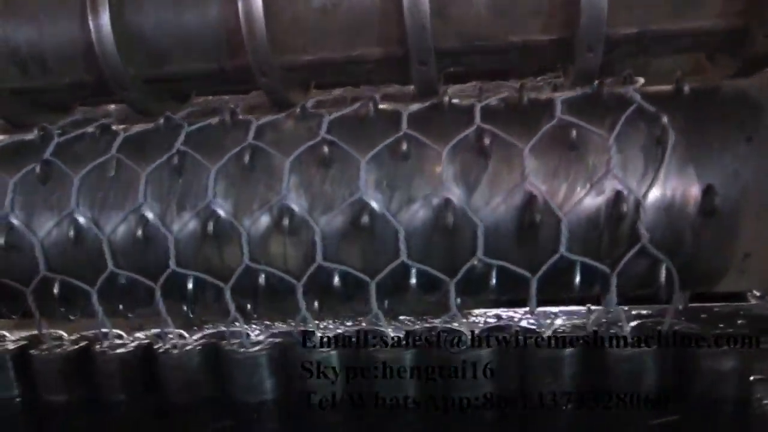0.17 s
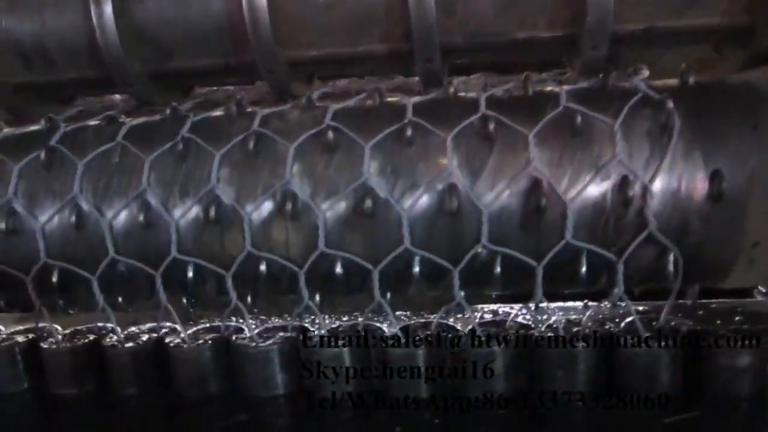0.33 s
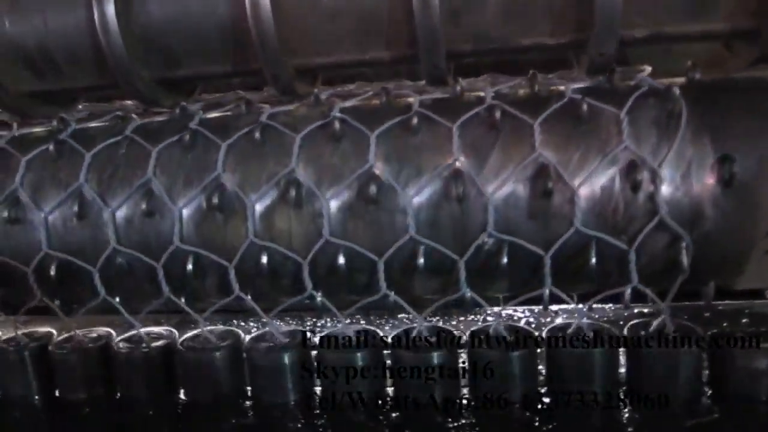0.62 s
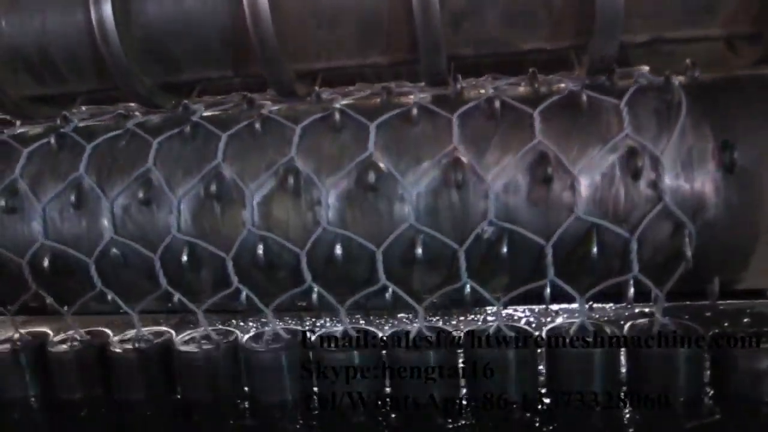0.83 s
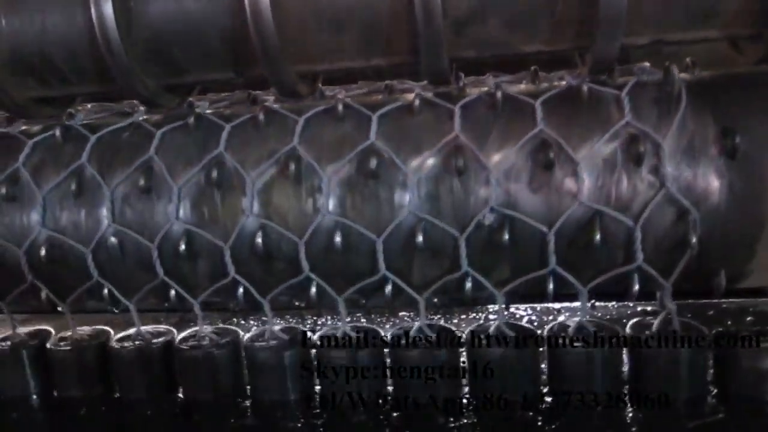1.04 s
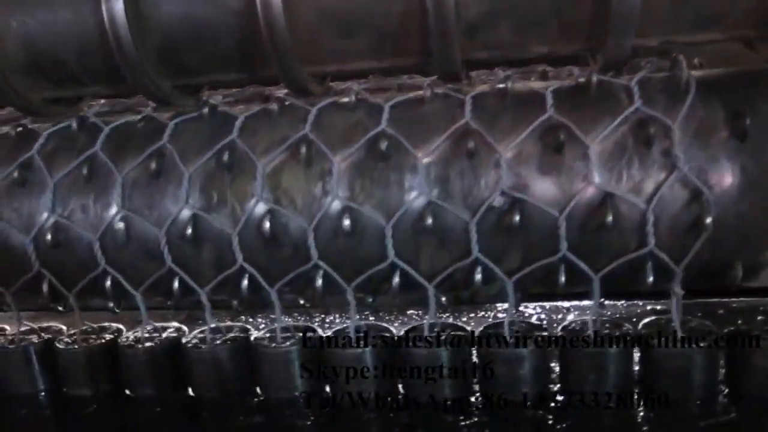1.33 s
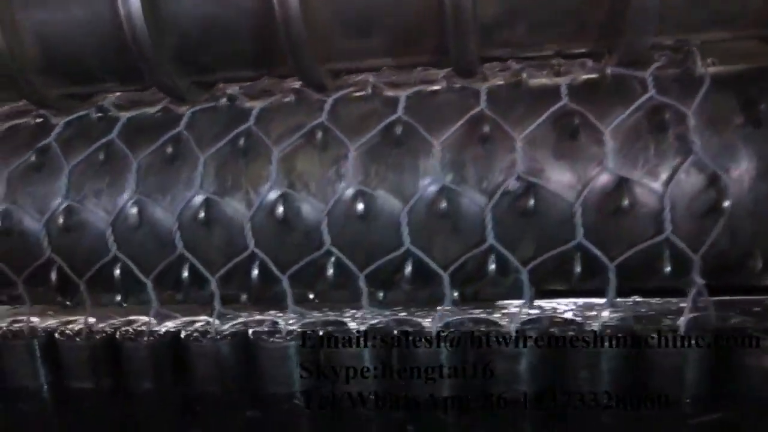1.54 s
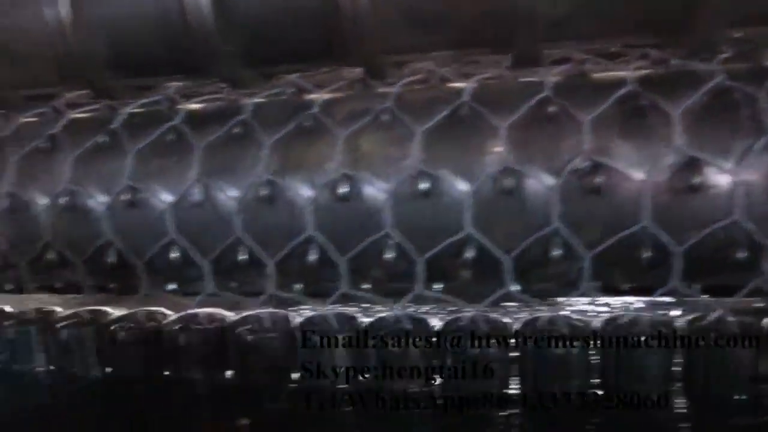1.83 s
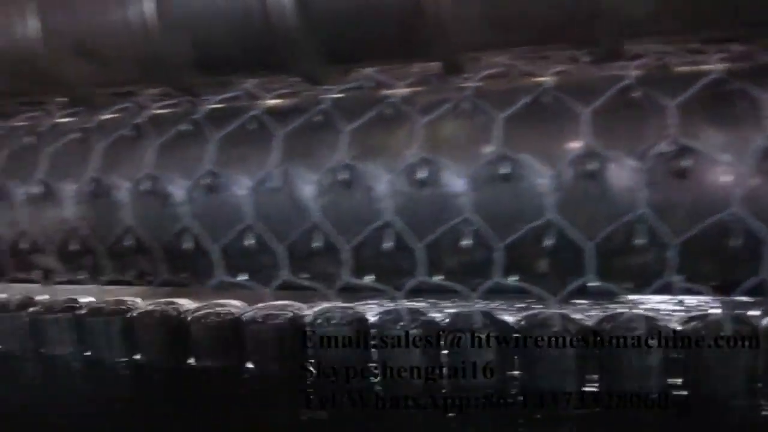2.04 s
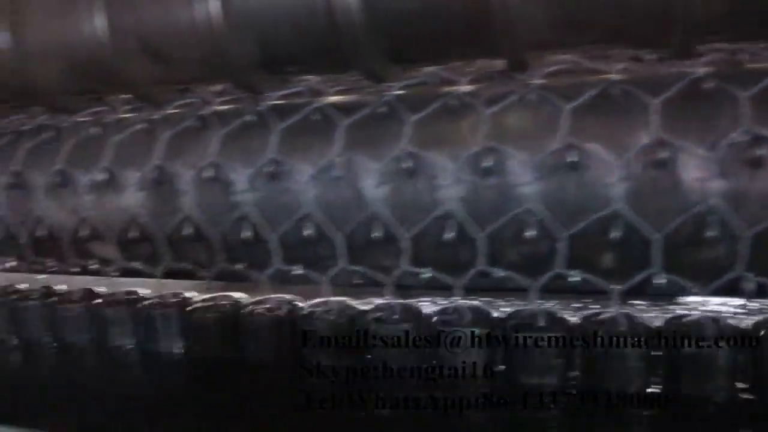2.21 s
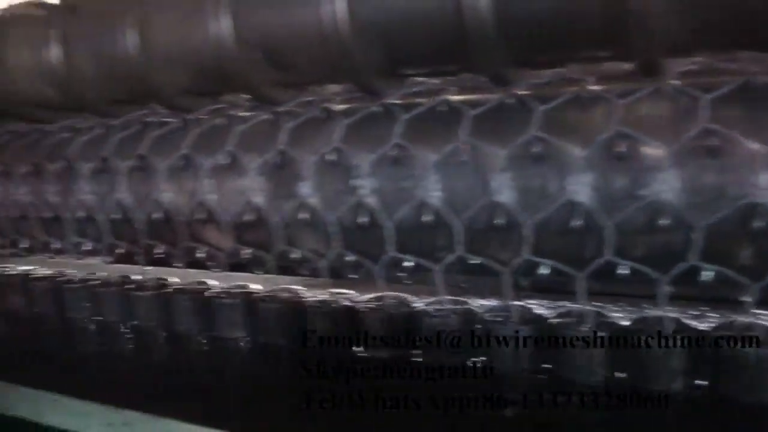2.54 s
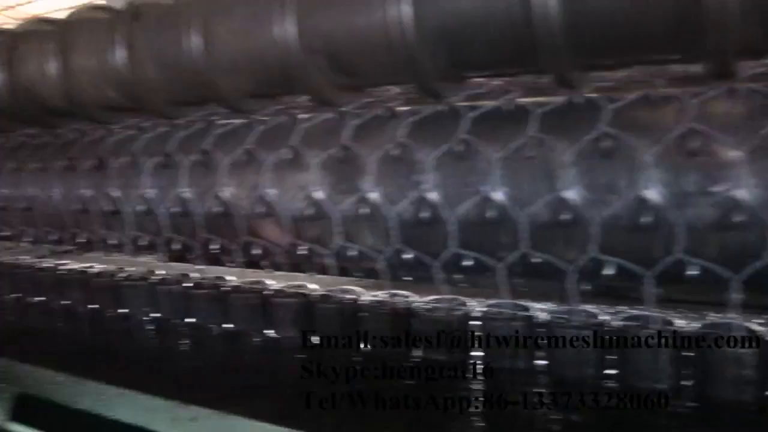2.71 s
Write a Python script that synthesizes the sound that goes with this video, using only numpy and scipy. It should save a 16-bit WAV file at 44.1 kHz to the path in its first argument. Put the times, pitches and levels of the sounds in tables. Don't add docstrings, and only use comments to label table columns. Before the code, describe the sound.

Close stereo pickup of a mesh-weaving machine: bright metal clanks and heavy rack slams come in bursts, gears and wires rattle between them, a thin bearing whistle appears midway, and the hall adds a short dull tail.

```python
import sys
import numpy as np
from scipy import signal
from scipy.fft import rfft, irfft, next_fast_len
from scipy.io import wavfile

SR = 44100
rng = np.random.default_rng(int(sys.argv[2]) if len(sys.argv) > 2 else 0)


def master(y):
    cut = np.clip(np.atleast_2d(y).T, -1, 1)
    pcm = np.round(cut * 32767)
    wavfile.write(sys.argv[1], SR, pcm.astype(np.int16))


def volts(x):
    e = np.asarray(x, float) / 20
    return 10 ** e


N = 126567

# [t/s, level/dB]
TWIST_LEVEL = [(0, -31), (.1, -28), (.235, -34), (.28, -38), (.45, -30.5), (.65, -26.5), (.9, -27.5),
               (1.3, -39.5), (1.5, -38), (1.64, -36), (1.8, -29.5), (2.05, -24), (2.25, -30), (2.55, -39.5),
               (2.7, -37), (2.87, -25)]
# [f/Hz, level/dB]
RATTLE_TONE = [(200, -1.5), (600, 9), (1300, 2), (2800, 2), (5000, -4.5), (7000, -12), (10600, -15),
               (13500, -24.5), (15500, -69)]
# [t/s, level/dB]
MOTOR_LOAD = [(0, -26), (.27, -27.5), (.6, -29), (1.0, -29.5), (1.3, -31.5), (1.62, -30.5), (2.0, -27.5),
              (2.4, -30), (2.6, -35), (2.87, -28)]
# [f/Hz, level/dB]
RUMBLE_TONE = [(25, -86), (50, 7), (100, 7.5), (300, 6.5), (600, -1), (1300, -13.5), (6000, -26.5)]
# [t/s, peak level/dB, chatter length/s, sizzle level/dB]
SPINDLE_CLANKS = [(0.0936, -10, 0.0074, -19), (0.155, -39, 0.0071, -17), (0.222, -17.5, 0.0013, -29),
                  (0.2925, -5.5, 0.0079, -13.5), (0.333, -8.5, 0.015, -26), (0.374, -4, 0.014, -11.5),
                  (0.45, -21, 0.0054, -4), (0.7045, -9, 0.0035, -22), (0.7952, -10.5, 0.0049, -22),
                  (0.8565, -17, 0.0091, -14), (0.8802, -15, 0.0095, -27), (0.949, -26, 0.012, -11),
                  (1.144, -31, 0.0064, -7), (1.347, -22.5, 0.017, -50), (1.3695, -6, 0.0046, -14),
                  (1.415, -8, 0.014, -16), (1.645, -7.5, 0.0043, -13.5), (1.688, -11.5, 0.022, -30),
                  (1.733, -9.5, 0.0036, -14), (1.7787, -10.5, 0.0038, -6), (1.873, -16, 0.0059, -69),
                  (1.927, -18, 0.0061, -19), (1.944, -18, 0.025, -6), (2.033, -20, 0.011, -32),
                  (2.156, -8, 0.0045, -8.5), (2.219, -19, 0.016, -7), (2.5882, -17.5, 0.0032, -11),
                  (2.616, -26, 0.0079, 0), (2.723, -20, 0.017, -12), (2.7544, -17, 0.015, -26),
                  (0, -15.5, 0.0013, -39), (0.109, -10.5, 0.0078, -16), (0.395, -10.5, 0.024, -15.5),
               (0.521, -16.5, 0.032, -20), (0.584, -25.5, 0.051, -6.5), (0.748, -22, 0.037, -3.5),
               (1.081, -31.5, 0.023, -4), (1.39, -7, 0.012, -12.5), (1.436, -10, 0.0059, -13),
               (1.379, -6.5, 0.0086, -24), (0.154, -24, .003, -16), (2.663, -36, 0.045, 6),
               (2.005, -28, 0.0072, -4), (2.181, -23, 0.03, -3.5), (2.636, -24.5, 0.02, -1),
               (2.86, -12, 0.013, -24)]
# [f/Hz, level/dB]
SPINDLE_MODES = [(2350, -9), (2780, -3), (3100, -3), (3340, -1), (3560, -2), (3900, -5), (4350, -3),
                 (4650, -2), (5130, -6)]
# [f/Hz, level/dB]
CRACK_TONE = [(300, 5.5), (1000, 3), (2500, 8), (5000, 3), (7000, 0), (8500, -17)]
# [f/Hz, level/dB]
SIZZLE_TONE = [(7000, -3.5), (8800, 2), (10900, 3.5), (12000, -4.5), (15600, -11)]
# [t/s, peak level/dB, f/Hz, ring t60/s]
PIN_PINGS = [(0.097, -26, 2670, 0.058), (.112, -22, 4220, 0.046), (0.219, -22, 2660, 0.032),
             (0.293, -14, 2840, 0.063), (0.2917, -10, 3290, .05), (.2925, -18, 4600, 0.14),
             (0.303, -19, 2700, 0.03), (0.293, -21, 1380, .1), (.336, -13.5, 1207, 0.091),
             (.341, -20, 3040, 0.033), (0.339, -18, 4730, .04), (0.375, -10.5, 4300, 0.044),
             (0.381, -22, 2900, 0.055), (0.393, -13, 2870, 0.032), (.462, -25, 3120, 0.044),
             (.705, -17, 3600, 0.023), (.001, -18, 4590, 0.036), (0.887, -20, 2540, 0.03),
             (1.143, -24.5, 2860, .045), (1.3689, -12.5, 4010, 0.041), (1.378, -14, 2890, .04),
             (1.385, -13, 3320, 0.051), (1.386, -20, 2180, 0.033), (1.394, -27, 2900, 0.036),
             (1.396, -11, 4540, .05), (1.420, -21, 2760, 0.05), (1.424, -15.5, 4970, .05),
             (1.436, -13, 4500, .04), (1.439, -29, 3120, 0.025), (1.6454, -13, 2760, 0.04),
             (1.647, -12, 3500, 0.02), (1.648, -14, 4560, 0.028), (1.651, -21, 4700, 0.018),
             (1.672, -18.5, 1295, 0.12), (1.735, -10.5, 3570, 0.03), (1.7827, -14, 2390, 0.029),
             (1.7812, -17, 3300, 0.028), (1.7816, -18.5, 4250, 0.033), (2.158, -19.5, 2770, .05),
             (2.157, -19, 4610, 0.045), (2.221, -17, 3470, 0.041), (2.220, -22.5, 1244, .1),
             (2.700, -32, 5600, .06), (2.735, -43, 5700, 0.041), (2.760, -19.5, 3130, .04),
             (2.802, -26, 4860, .06)]
# [t/s, level/dB, length/s]
WIRE_SQUEAKS = [
    (0.092, -33, 0.021),
    (0.569, -36, 0.046),
    (0.932, -37, 0.017),
    (1.005, -51, 0.068),
]
# [f/Hz, width/Hz, level/dB]
WIRE_RESONANCES = [(4103, 220, 5.5), (6090, 150, -4)]
# [t/s, level/dB]
WHISTLE_LEVEL = [(0, -72), (.88, -37), (.93, -48), (1.0, -45), (1.035, -35), (1.09, -54), (1.115, -34),
                 (1.16, -39), (1.185, -41), (1.21, -42), (1.33, -41.5), (1.37, -39), (1.42, -70)]
# [t/s, level/dB, length/s, clatter level/dB]
RACK_THUDS = [(0.099, -21.5, 0.057, -23), (0.291, -27, 0.03, 6), (0.321, -23.5, 0.034, 6.5),
              (0.369, -14, 0.03, -8), (0.502, -21.5, 0.047, -9.5), (0.766, -26.5, 0.069, -0.5),
              (1.34, -18, 0.021, -19), (1.366, -16.5, 0.044, -9.5), (1.422, -21, 0.032, -12),
              (1.641, -27, 0.076, 1.5), (1.687, -13, 0.03, -2.5), (1.735, -19.5, 0.023, -2.5),
              (1.953, -18, 0.027, -32), (2.207, -33, 0.065, -2.5), (2.722, -23, 0.048, -5.5),
              (2.835, -27, 0.043, -15)]
# [f/Hz, level/dB]
FRAME_MODES = [(156, -14), (228, -16), (266, 0.5), (323, 0), (385, -3.5), (520, -5.5), (660, -2),
               (780, -5.5), (930, -16), (1200, -5), (1425, -10.5)]
# [f/Hz, level/dB]
CLATTER_TONE = [(150, 1.5), (400, 2), (1100, 4), (2200, -1), (5000, -25)]
# [f/Hz, level/dB]
STEREO_WIDTH = [(30, -7), (70, -29), (125, -33), (250, -23.5), (500, -18.5), (1000, -10.5), (2000, -5.5),
                (5000, -1)]
# [f/Hz, level/dB]
STEREO_LEAN = [(300, 0), (1200, -2), (4000, -0.1)]

CHATTER_PER_S, CHATTER_SPREAD_DB = 7100, 3.5
CLANK_RISE_S, CRACK_T60_S = 0.0006, 0.036
SPINDLE_T60_S, FRAME_T60_S = 0.016, 0.07
THUD_RISE_S, THUD_T60_S = 0.0072, 0.084
HALL_T60_S, HALL_DB, HALL_CUT_HZ = 0.66, -10.5, 5100
WHISTLE_HZ, WHISTLE_WANDER_HZ = 3936, 5
NOTCH_HZ, NOTCH_WIDTH_HZ = 8210, 1170
LOW_CUT_HZ, TOP_CUT_HZ, OVERLOAD = 89, 16400, 0.95


def rms_one(x):
    return x / np.sqrt(np.mean(x ** 2) + 1e-20)


def in_time(rows):
    return np.interp(np.arange(N) / SR, *np.transpose(rows))


def at_hz(points, hz):
    f, value = np.transpose(points)
    return np.interp(np.log(hz + 1), np.log(f), value)


def colour(x, points):
    size = next_fast_len(N + 8192)
    log_gain = at_hz(points, np.arange(4097) * SR / 8192) * np.log(10) / 20
    cepstrum = irfft(log_gain)
    cepstrum[1:4096] *= 2
    cepstrum[4097:] = 0
    impulse = irfft(np.exp(rfft(cepstrum)))
    return irfft(rfft(x, size) * rfft(impulse, size), size)[..., :N]


def drift(rate):
    r = np.exp(-80 * np.pi * rate / SR)
    noise = rng.standard_normal(N // 40 + 2002)
    slow = signal.lfilter([1], [1, -2 * r, r * r], noise)[2000:]
    return np.interp(np.arange(N) / 40, np.arange(len(slow)), rms_one(slow))


def ring(x, hz, t60):
    r = volts(-60 / (t60 * SR))
    w = 2 * np.pi * hz / SR
    gain = np.sin(w) * 2 * np.sqrt(1 - r)
    return signal.lfilter([0, gain], [1, -2 * r * np.cos(w), r * r], x + 1e-18)


def contacts(rate, spread_db):
    sizes = volts(spread_db * np.minimum(rng.exponential(1, (2, N)), 4.0))
    sizes = sizes * rng.choice([-1, 1], (2, N))
    return rms_one(sizes * (rng.random((2, N)) < rate / SR))


def bursts(s, db, length, rise, t60):
    t = np.arange(N) / SR
    power = np.zeros(N)
    for start, level_db, hold in zip(s, db, np.clip(length, .001, .1)):
        part = slice(int(start * SR), int((start + rise + hold + t60) * SR))
        age = t[part] - start
        fall_db = 60 * np.maximum(age - rise - hold, 0) / t60
        power[part] += (volts(level_db - fall_db) * np.clip(age / rise, 0, 1)) ** 2
    return np.sqrt(power)


def struck(modes, s, db, length, rise, t60, drive, decay):
    scatter_db = 3 * rng.standard_normal((len(s), len(modes)))
    out = np.zeros((2, N))
    for k, (hz, level_db) in enumerate(modes):
        blows = bursts(s, db + level_db + scatter_db[:, k], length, rise, t60)
        out += ring(drive * blows, hz, min(decay, 45 / hz))
    return out


def rattle():
    hits = contacts(6500, 2.5) * volts(2.2 * drift(25) + 1.5 * drift(8))
    pitches = np.geomspace(300, 15000, 30)
    dealt = rng.integers(0, 30, N)
    rings = np.zeros((2, N))
    for k, hz in enumerate(pitches):
        rings += np.sqrt(hz) * ring(hits * (dealt == k), hz, min(70 / hz, .05))
    fine = contacts(20000, 0.26) * volts(0.3 * drift(43))
    grit = colour(0.81 * rms_one(rings) + fine, RATTLE_TONE)
    return rms_one(grit) * volts(in_time(TWIST_LEVEL) + 1.5)


def rumble():
    noise = rng.standard_normal((2, N))
    body = sum(volts(db) * ring(noise, hz, FRAME_T60_S) for hz, db in FRAME_MODES)
    motors = rms_one(colour(noise, RUMBLE_TONE))
    return rms_one(motors + 0.19 * rms_one(body)) * volts(in_time(MOTOR_LOAD) + 0.91 * drift(9))


def clanks():
    s, db, length, sizzle_db = np.transpose(SPINDLE_CLANKS)
    chatter = contacts(CHATTER_PER_S, CHATTER_SPREAD_DB)
    rings = struck(SPINDLE_MODES, s, db - 20, length, CLANK_RISE_S, 0.19 / 3, chatter, SPINDLE_T60_S)
    crack = rms_one(colour(contacts(CHATTER_PER_S, CHATTER_SPREAD_DB), CRACK_TONE))
    crack = crack * bursts(s, db - 12.5, length, CLANK_RISE_S, CRACK_T60_S)
    sizzle = rms_one(colour(contacts(3500, 4.2), SIZZLE_TONE))
    sizzle = sizzle * bursts(s, db + sizzle_db - 6, length, CLANK_RISE_S, CRACK_T60_S)
    return rings + crack + sizzle


def pings():
    out = np.zeros((2, N))
    chance = rng.random((len(PIN_PINGS), 4, 1)) * 2 * np.pi
    for (s, db, hz, t60), phase in zip(PIN_PINGS, chance):
        start = int(s * SR)
        t = np.arange(min(int(t60 * SR), N - start)) / SR
        pair = np.sin(2 * np.pi * hz * t + phase[:2])
        pair = pair + 0.34 * np.sin(2 * np.pi * hz * 1.025 * t + phase[2:])
        out[:, start:start + len(t)] += pair * volts(db - 60 * t / t60) * np.minimum(t / 0.0004, 1)
    return out


def narrow(noise, hz, width):
    return rms_one(ring(ring(noise, hz, 2.2 / width), hz, 2.2 / width))


def squeal():
    noise = rng.standard_normal((2, N))
    s, db, length = np.transpose(WIRE_SQUEAKS)
    rub = sum(volts(level_db) * narrow(noise, hz, width) for hz, width, level_db in WIRE_RESONANCES)
    squeaks = rub * bursts(s, db, length, 0.015, 0.24)
    phase = 2 * np.pi * np.cumsum(WHISTLE_HZ + WHISTLE_WANDER_HZ * drift(21)) / SR
    whistle = np.array([np.sin(phase), np.cos(phase)])
    return squeaks + whistle * volts(in_time(WHISTLE_LEVEL) + 2.5 * drift(25))


def thuds():
    s, db, length, clatter_db = np.transpose(RACK_THUDS)
    drive = contacts(1500, 1.1)
    boom = struck(FRAME_MODES, s, db, length, THUD_RISE_S, THUD_T60_S, drive, FRAME_T60_S)
    clatter = rms_one(colour(contacts(3000, 2.7), CLATTER_TONE))
    return volts(-13.5) * boom + clatter * bursts(s, db + clatter_db, length, THUD_RISE_S, 0.04)


def hall(x):
    t = np.arange(int(1.2 * SR)) / SR
    tail = rng.standard_normal((2, len(t))) * volts(-60 * t / HALL_T60_S) * np.clip(t / 0.0028, 0, 1)
    tail = signal.lfilter([1], [1, -np.exp(-2 * np.pi * HALL_CUT_HZ / SR)], tail)
    return signal.fftconvolve(x, tail / np.sqrt(np.sum(tail ** 2) / 2), axes=1)[:, :N]


def scene():
    steady = rattle() + rumble()
    blows = clanks() + pings()
    steady = steady + squeal()
    blows = blows + thuds()
    mid, side = steady + blows + volts(HALL_DB) * hall(blows)
    side = colour(side, STEREO_WIDTH)
    lean = np.array(STEREO_LEAN) * [1, .5]
    left = colour(mid + side, lean)
    right = colour(mid - side, lean * [1, -1])
    return np.array([left, right])


def band_limit(x):
    return signal.sosfilt(signal.butter(12, 15760, fs=SR, output="sos"), x)


def record(dry):
    b, a = signal.iirnotch(NOTCH_HZ, NOTCH_HZ / NOTCH_WIDTH_HZ, SR)
    for _ in range(2):
        dry = signal.lfilter(b, a, dry)
    dry = signal.sosfilt(signal.butter(2, LOW_CUT_HZ, "high", fs=SR, output="sos"), dry)
    rounded = OVERLOAD * np.tanh(dry / OVERLOAD)
    mix = signal.sosfilt(signal.cheby2(12, 60, TOP_CUT_HZ, fs=SR, output="sos"), rounded)
    return band_limit(mix)


dry = scene()
out = record(dry)
master(out)
```